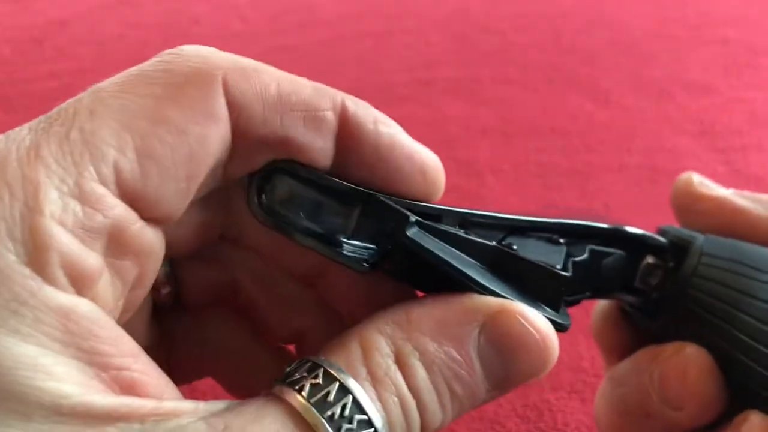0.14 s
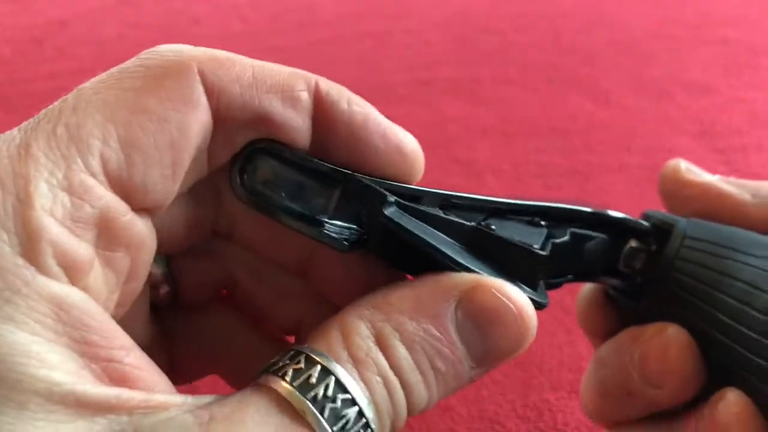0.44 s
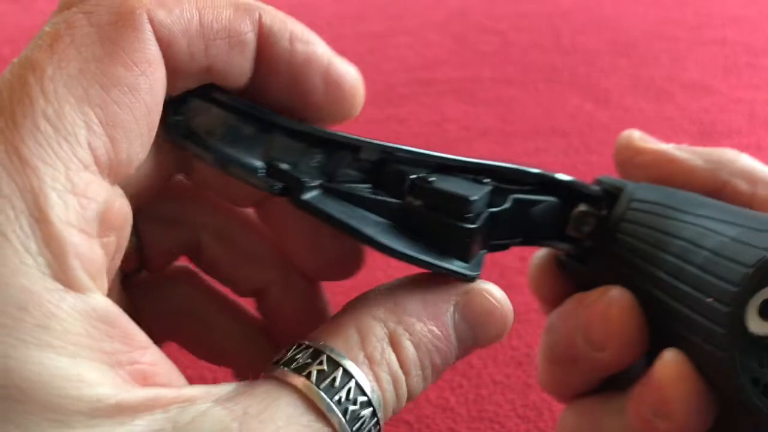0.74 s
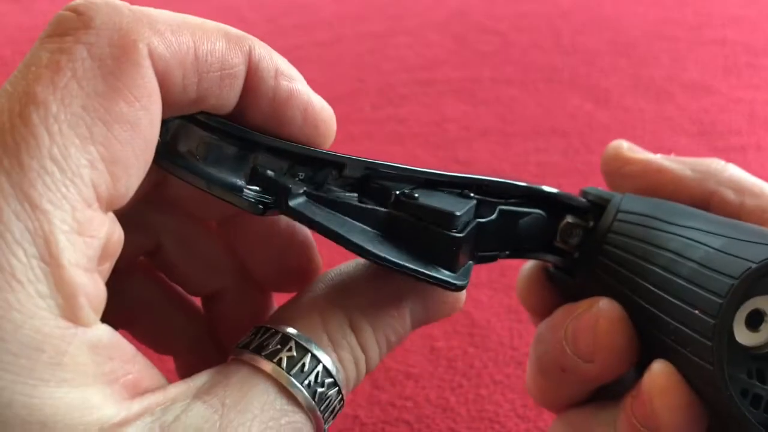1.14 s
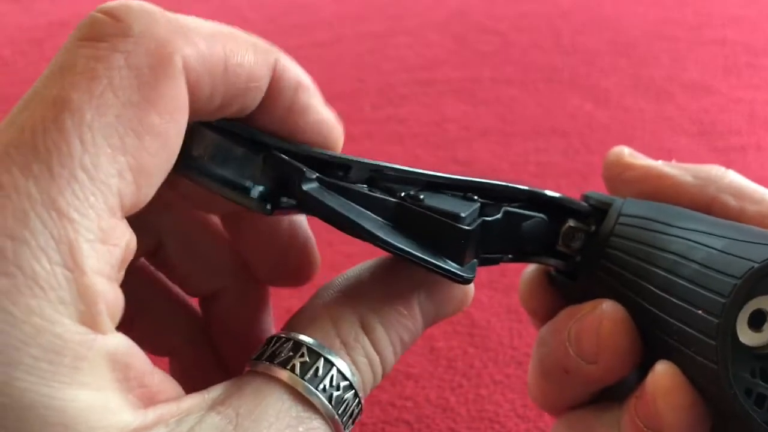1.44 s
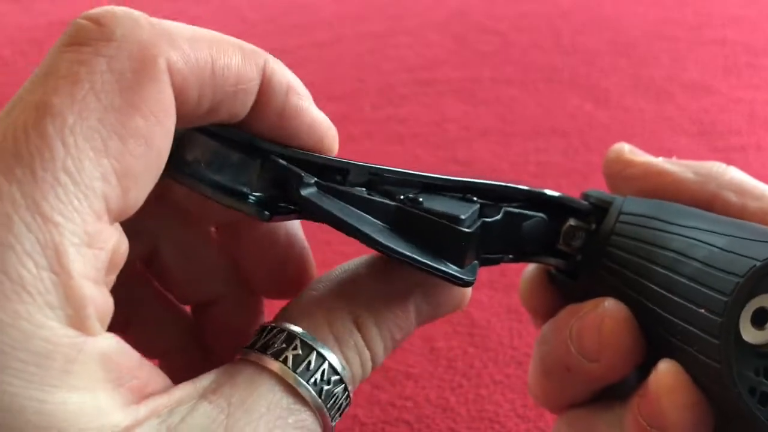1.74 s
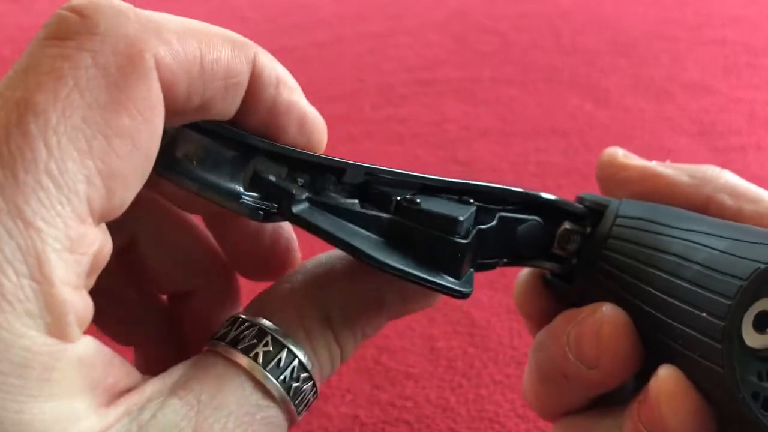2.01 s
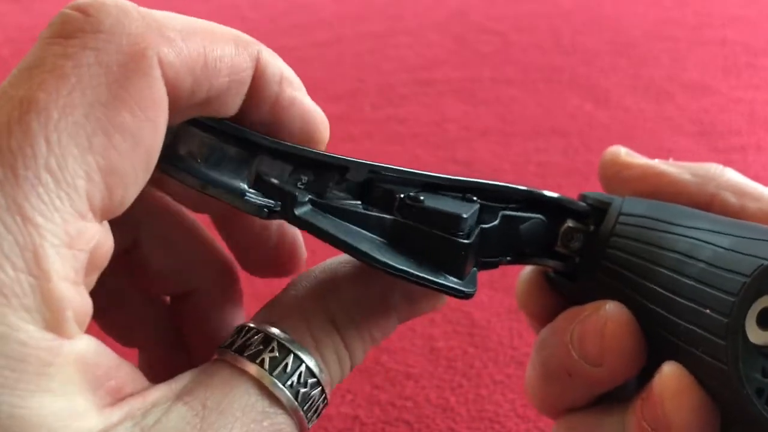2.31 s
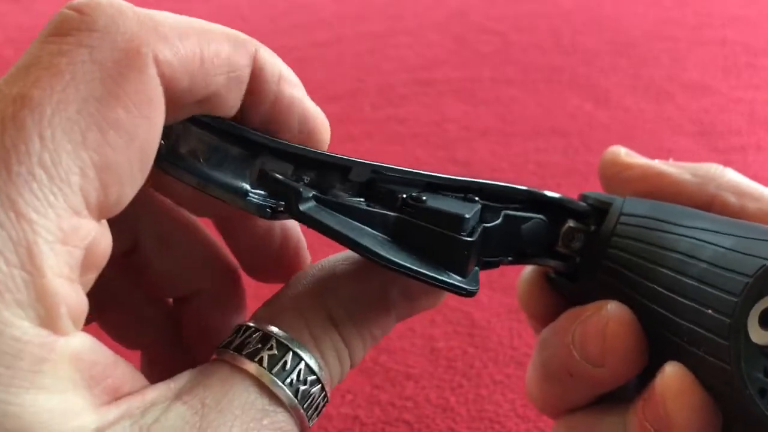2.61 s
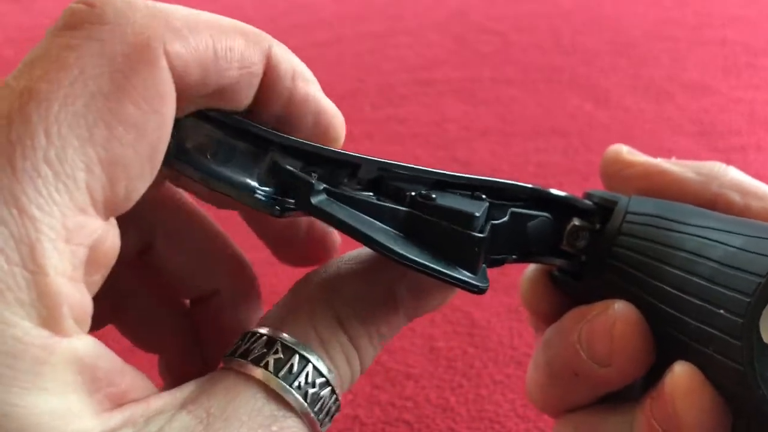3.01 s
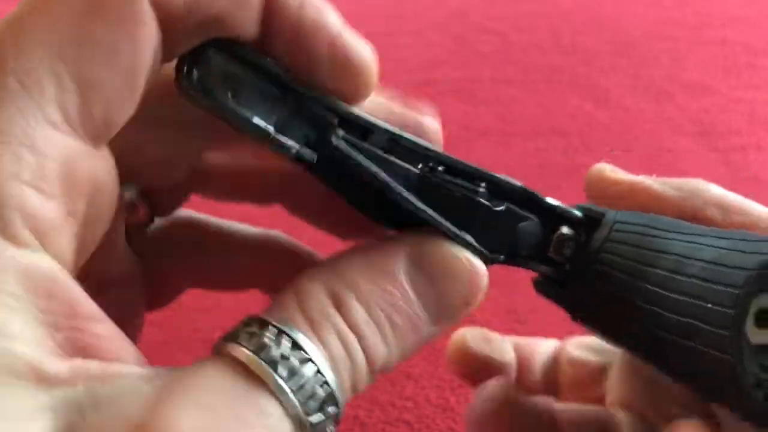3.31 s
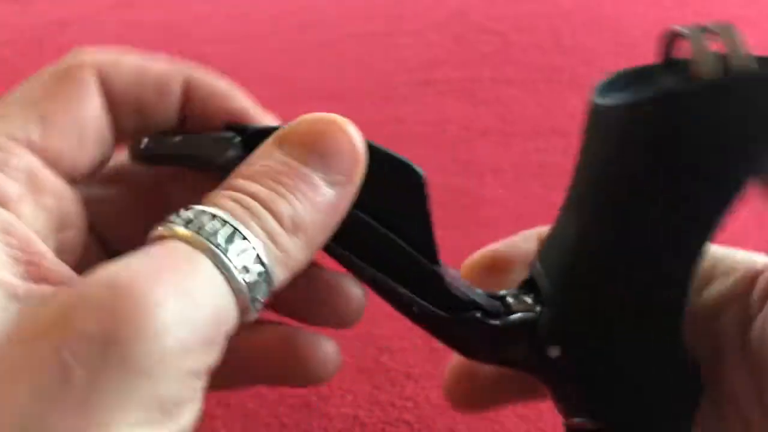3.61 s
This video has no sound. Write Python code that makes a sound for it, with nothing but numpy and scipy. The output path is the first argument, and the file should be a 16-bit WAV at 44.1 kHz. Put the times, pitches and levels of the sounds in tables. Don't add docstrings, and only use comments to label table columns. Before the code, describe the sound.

Two small buttons on a plastic lever snap under a thumb, very close to a phone microphone; first a short run, then a longer sharper one, then skin rubbing and one hard knock over faint room hiss.

```python
import sys
import numpy as np
from scipy import signal
from scipy.fft import rfft, irfft
from scipy.io import wavfile
from scipy.ndimage import uniform_filter1d

SR = 44100
rng = np.random.default_rng(int(sys.argv[2]) if len(sys.argv) > 2 else 0)


def int16_out(signal):
    q = np.round(np.clip(np.atleast_2d(signal).T, -1, 1) * 32767)
    wavfile.write(sys.argv[1], SR, q.astype(np.int16))


def rack_gain(trim_db):
    fader = np.asarray(trim_db, float)
    return 10 ** (fader / 20)


N = 165375
LEAD = 4410

# t/s, peak level/dB; one release of A falls before t = 0
A_PRESSES = [
    (0.1883, -3.5),
    (0.4698, -5),
]
A_RELEASES = [
    (0.3285, -6),
    (0.5829, -7.5),
              (-.03, -8),
]
B_PRESSES = [
    (1.3638, -0.89),
    (1.7131, -.6),
    (2.1727, -1),
    (2.5239, -0.26),
    (2.7846, -0.24),
]
B_RELEASES = [
    (1.5355, -5.5),
    (1.8539, -5.5),
    (2.3515, -5.5),
    (2.6597, -6),
    (2.9396, -6),
]
# f/Hz, width/Hz, level/dB
A_PRESS_CRACK = [(4000, 520, -31), (6240, 1800, -6), (11500, 4700, -10)]
A_RELEASE_CRACK = [(4350, 1000, -19), (5540, 650, -12.5), (12960, 1800, -17)]
B_PRESS_CRACK = [(7100, 1400, -3.5), (13900, 1200, -5)]
B_RELEASE_CRACK = [(5410, 1230, -4), (6600, 1460, -9), (13100, 1500, -21.5)]
# f/Hz, width/Hz, level/dB
A_PRESS_MODES = [(1600, 210, -19), (3270, 270, -8), (4730, 420, 0.5), (6350, 1300, -7), (7920, 390, -4.5),
                 (9910, 520, 2), (10750, 760, -2), (12400, 1640, 0.5), (14500, 1160, -19)]
A_RELEASE_MODES = [(1920, 530, -20.5), (3380, 430, -7), (4430, 720, -2.5), (5630, 570, -8.5),
                   (6790, 380, -14.5), (10000, 350, -12.5), (11020, 600, -8.5), (15400, 890, -20)]
B_PRESS_MODES = [(1750, 450, -19), (3300, 450, -8), (4400, 550, -3), (5800, 900, -2), (7000, 700, -5),
                 (8450, 1200, 2), (9500, 500, -4), (12200, 800, 2), (13700, 900, 3), (14800, 800, 0),
                 (15700, 700, -3)]
B_RELEASE_MODES = [(1840, 374, -16.5), (3390, 580, -6.5), (4450, 605, -3), (7880, 487, -5),
                   (10400, 350, -19), (12150, 610, -16), (12940, 460, -19), (16800, 270, -57)]
# gain/dB, thump level/dB, knock level/dB, hand echo delay/ms, hand echo level/dB
SNAP_KINDS = [
    (7, -42, -38, .28, -12.5),
    (4, -45.5, -50.5, .69, -8),
    (5.5, -46, -49, .75, -16.5),
    (4.5, -49.5, -52.5, .7, -15),
]
HAND_RATTLE_DB = [
    -23,
    -27,
    -24,
    -28,
]
# f/Hz, width/Hz, level/dB
WALL_SPILLS = [
    [(1600, 500, -8.5), (7000, 3100, 0.5), (10500, 3200, 0.5)],
    [(4460, 2000, -2.5), (3300, 1200, -8.5), (7000, 2200, -12)],
    [(5000, 3000, -5.5), (9900, 2600, -4), (12200, 5100, -4)],
    [(4800, 1500, 5), (3160, 2700, -5), (7000, 2700, -11)],
]
WALL_SPILL_DB = [
    0,
    2,
    -0.5,
    -0.5,
]


def buttons():
    snaps, body, spill = np.zeros((3, N + LEAD))
    parts = [
        (A_PRESSES, A_PRESS_CRACK + A_PRESS_MODES),
        (A_RELEASES, A_RELEASE_CRACK + A_RELEASE_MODES),
        (B_PRESSES, B_PRESS_CRACK + B_PRESS_MODES),
        (B_RELEASES, B_RELEASE_CRACK + B_RELEASE_MODES),
    ]
    steep = 1.467
    rise_s, choke_s = 0.00012, 0.0042
    rattle_rise_s, rattle_t60_s = 0.00012, 0.011
    t = np.arange(SR // 100) / SR
    shape = np.minimum(t / rise_s, 1) * np.exp(-(t / choke_s) ** 2)
    rattle_shape = np.minimum(t / rattle_rise_s, 1) * np.exp(-np.log(1000) * t / rattle_t60_s)
    thump = ring([(250, 68, 0)])
    jolt = ring([(119.3, 52, 0)], size=4096, steep=1.94)
    knock = ring([(1766, 260, 0)], steep=1.65)

    for (events, modes), kind, rattle_db, broad, spill_db in zip(
            parts, SNAP_KINDS, HAND_RATTLE_DB, WALL_SPILLS, WALL_SPILL_DB):
        gain_db, thump_db, knock_db, echo_ms, echo_db = kind
        hand = rack_gain(rattle_db) * rng.standard_normal(len(t)) * rattle_shape
        hand[0] = 1
        hand[int(echo_ms * SR / 1000)] = rack_gain(echo_db)
        for s, db in events:
            snap = ring(modes, rng.standard_normal((len(modes), 1)), steep=steep)
            snap = np.convolve(snap, hand)[:len(t)] * shape
            add(snaps, s, rack_gain(db + gain_db) * snap)
            add(spill, s, rack_gain(db + spill_db + 7) * ring(broad, steep=steep))
            add(body, s, rack_gain(thump_db) * thump)
            add(body, s + 0.008, rack_gain(-52.5) * jolt)
            add(body, s + 0.0035, rack_gain(knock_db) * knock)
    thin = signal.lfilter(*signal.butter(2, 1210, "high", fs=SR), snaps)
    return thin + body, spill


# t/s, peak level/dB, length/ms
RING_KNOCKS = [
    (3.5198, -22.5, 0.041),
    (3.5203, -20.5, 0.36),
    (3.5207, -13, 0.048),
    (3.521, -10, 0.63),
    (3.5225, -22, 1.5),
]
# f/Hz, width/Hz, level/dB
RING_KNOCK_MODES = [(944, 470, -6), (1710, 320, 0), (2500, 440, 3), (4200, 400, -16), (5260, 600, -10),
                    (6900, 450, -3.5), (8000, 540, -5), (8630, 380, -3), (10650, 2100, -7),
                    (11500, 350, -3), (13700, 2800, -13.5)]
# t/s, peak level/dB, length/ms
LEVER_RATTLES = [
    (3.5245, -41, 4.9),
    (3.527, -27, 1.2),
    (3.5303, -30, 2),
    (3.5315, -22.5, 3.3),
    (3.5345, -43, 2),
    (3.538, -29, 3.1),
    (3.543, -41, 6.2),
    (3.552, -43, 8.6),
]
# f/Hz, width/Hz, level/dB
LEVER_RATTLE_MODES = [(630, 1500, -7.5), (1670, 870, 0), (2600, 320, -0.5), (3230, 250, 7.5),
                      (4280, 1800, -11), (5570, 470, 0), (6900, 900, -6), (8160, 900, -15), (9400, 530, -8),
                      (11400, 400, 2)]
# t/s, peak level/dB, length/ms
LEVER_TAPS = [
    (3.448, -28, 1.8),
    (3.4588, -39, 2.5),
]
# f/Hz, width/Hz, level/dB
LEVER_TAP_MODES = [(1890, 190, -7), (3240, 210, -4.5), (3980, 300, -1.5), (5300, 370, -9), (6200, 370, -1),
                   (8500, 440, -3), (10100, 370, -13), (11400, 190, -10), (12100, 350, -11)]


def lever_contacts():
    knocks = chatter(RING_KNOCKS, RING_KNOCK_MODES)
    rattles = chatter(LEVER_RATTLES, LEVER_RATTLE_MODES)
    return knocks + rattles + chatter(LEVER_TAPS, LEVER_TAP_MODES)


def chatter(events, modes):
    out = np.zeros(N + LEAD)
    t = np.arange(SR // 50) / SR
    for s, db, length_ms in events:
        burst = rng.standard_normal(len(t)) * np.exp(-(t * 1000 / length_ms) ** 2)
        response = ring(modes, rng.standard_normal((len(modes), 1)), size=4096, steep=1.467)
        y = np.convolve(burst, response)
        add(out, s, rack_gain(db) * y / np.abs(y).max())
    return out


# t/s, peak level/dB, f/Hz, width/Hz
TICKS_AND_THUDS = [(0.63, -43, 1320, 506), (0.631, -46, 275, 100), (.668, -41.5, 6500, 3000),
                   (.6285, -45.5, 805, 900), (0.671, -43.5, 1605, 260), (1.040, -62.5, 4210, 890),
                   (1.281, -49, 9000, 7000), (1.321, -47.5, 8000, 7000), (1.343, -52, 10100, 7000),
                   (1.852, -33, 4800, 2500), (2.443, -25, 8000, 9000), (2.503, -49, 8000, 6040),
                   (2.665, -20.5, 6500, 3000), (3.1985, -29, 6500, 5000), (3.1985, -40, 11100, 5000),
                   (3.387, -46.5, 1490, 1200), (3.391, -46, 1740, 700), (3.48, -44, 7000, 7000),
                   (3.509, -33, 7000, 5000), (3.582, -52, 11500, 400), (1.924, -52, 1600, 300),
                   (3.407, -54, 1500, 250), (3.455, -50, 1820, 300), (3.459, -41, 3420, 500),
                   (3.5, -53, 1500, 300), (3.51, -36, 2080, 500), (3.572, -37, 9000, 4000),
                   (3.574, -51, 11400, 300), (3.5209, -41.5, 315, 347), (3.53, -49.5, 68, 25),
                   (3.742, -49.5, 1530, 400)]


def ticks():
    out = np.zeros(N + LEAD)
    for s, db, hz, width in TICKS_AND_THUDS:
        add(out, s, rack_gain(db) * ring([(hz, width, 0)], size=6144, steep=2))
    return out


# start t/s, length/s, rms level/dB, share of broad hiss/0-1, pitch factor/1
FINGER_RUBS = [
    (0.743, 0.13, -62.5, 0.13, 1),
    (0.895, 0.094, -68, .02, 1),
    (1.084, 0.047, -61, 0.1, 1.05),
    (3.114, 0.13, -61, 0.3, 1.1),
    (3.178, 0.095, -58, 0.25, 0.97),
    (3.185, 0.021, -60, .95, 1.01),
    (3.336, 0.1, -60, 0.1, 0.923),
    (3.414, 0.079, -51, 1, 1.01),
    (3.482, 0.1, -51, 0.72, 1.01),
    (3.672, 0.071, -59, 1, 1.01),
]
# f/Hz, width/Hz, level/dB
FINGER_RUB_MODES = [(1660, 630, -8.5), (3880, 990, -1.5), (9000, 1200, -4.5)]


def rubs():
    out = np.zeros(N + LEAD)
    broad = band(5100, 13200)
    grain = rack_gain(1.8 * walk(150))
    soft = treble_limit(8, 15500)
    for s, length, db, share, pitch in FINGER_RUBS:
        tuned = np.zeros(N)
        for hz, width, mode_db in FINGER_RUB_MODES:
            factor = pitch if hz < 6000 else 1
            tuned += rack_gain(mode_db) * band(hz * factor, width)
        slide = (np.sqrt(1 - share) * tuned + np.sqrt(share) * broad) * grain
        i, n = int(s * SR), int(length * SR)
        stroke = np.hanning(n) ** 0.47
        add(out, s, rack_gain(db) * stroke * signal.sosfilt(soft, slide[i:i + n]))
    return out


# delay t/ms, level/dB
WALL_ECHOES = [
    (8.2, -38),
    (11.5, -33),
    (16.8, -35),
    (20.5, -42.5),
]


def room(x):
    t = np.arange(SR // 2) / SR
    after = np.maximum(t - 0.0065, 0)

    def fade(t60_s):
        return np.exp(-np.log(1000) * after / t60_s) * (after > 0)

    noise = rng.standard_normal((2, len(t)))
    late = signal.lfilter(*signal.butter(2, 6500, fs=SR), noise[0]) * fade(0.34)
    early = rack_gain(0.5) * noise[1] * fade(0.24)
    tail = rack_gain(-30.5 - 29.0) * (late + early)
    for delay_ms, db in WALL_ECHOES:
        tail[int(delay_ms * SR / 1000)] += rack_gain(db)
    tail = tail + 0.13 * signal.lfilter(*signal.iirpeak(5200, 2.5, fs=SR), tail)
    tail = signal.sosfilt(treble_limit(8, 15500), tail)
    return signal.fftconvolve(x, tail)[:len(x)]


# f/Hz, level per Hz/dB
AIR_SPECTRUM = [(35, -41.5), (60, -1), (114, -7), (136, -2.5), (166, -12), (246, -5.5), (500, -24),
                (650, -29.5), (1100, -120)]
# f/Hz, level per Hz/dB
HISS_SPECTRUM = [(210, -13.5), (350, -7.5), (615, -6), (711, -6), (1450, -8.5), (3040, -10), (4540, -11.5),
                 (15200, -15.5), (16500, -50)]
# from t/s, to t/s, level/dB
HISS_GATE = [
    (0.985, 1.097, -8),
    (1.099, 1.159, -3.5),
    (1.156, 1.356, -9.5),
    (3.349, 3.406, -4.5),
]
# f/Hz, width/Hz, level/dB
HUM_BANDS = [
    (100, 6.9, -72),
    (153, 25, -74.5),
    (247.3, 11, -78.5),
]
# t/s, rms level/dB
RUMBLE_LEVEL = [(0, -57), (.15, -60), (.6, -63), (.9, -53.5), (1.4, -62), (1.7, -63), (2.2, -69),
                (3.75, -67)]


def floor():
    t = np.arange(N) / SR
    air = coloured(AIR_SPECTRUM, -62.5) * rack_gain(walk(18))
    hum = sum(rack_gain(db - 1.1 * walk(5.0)) * band(hz, width) for hz, width, db in HUM_BANDS)
    rumble = rack_gain(np.interp(t, *np.array(RUMBLE_LEVEL).T)) * band(43.4, 4)
    gate_db = sum(db * ((t > start) & (t < end)) for start, end, db in HISS_GATE)
    gate_db = uniform_filter1d(gate_db, int(0.0029 * SR))
    hiss = coloured(HISS_SPECTRUM, -62) * rack_gain(gate_db + 0.5 * walk(7.8))
    return air + hum + rumble + hiss


def port(x):
    hz, width_hz = 10900, 670
    return x - 0.54 * signal.lfilter(*signal.iirpeak(hz, hz / width_hz, fs=SR), x)


def ring(modes, chance=0, size=2048, steep=1):
    hz, width, db = np.array(modes, float).T[:, :, None]
    f = np.arange(size + 1) * SR / (2 * size) + 1
    hz = hz * (1 + 0.0027 * chance)
    db = db + 1.7 * chance
    detuning = (f - hz ** 2 / f) / width
    power = np.sum(rack_gain(db) ** 2 / (1 + detuning ** 2) ** steep, axis=0)
    cepstrum = irfft(np.log(power) / 2)[:size]
    causal = cepstrum * np.where(np.arange(size) > 0, 2, 1)
    y = irfft(np.exp(rfft(causal, 2 * size)))[:size]
    return y / np.abs(y).max()


def add(out, s, y):
    i = int(s * SR) + LEAD
    out[i:i + len(y)] += y[:len(out) - i]


def band(hz, width):
    peak = signal.iirpeak(hz, hz / width, fs=SR)
    y = signal.lfilter(*peak, signal.lfilter(*peak, rng.standard_normal(N)))
    return y / y.std()


def coloured(points, db):
    hz, gain_db = np.array(points, float).T
    log_f = np.log(np.arange(N // 2 + 1) * SR / N + 1)
    gain = rack_gain(np.interp(log_f, np.log(hz), gain_db, left=-90, right=-90))
    y = irfft(rfft(rng.standard_normal(N)) * gain, N)
    return y * rack_gain(db) / y.std()


def walk(rate):
    k = int(SR / rate)
    y = uniform_filter1d(uniform_filter1d(rng.standard_normal(N), k), k)
    return y / y.std()


def treble_limit(order, top_hz):
    return signal.cheby1(order, 0.5, top_hz, fs=SR, output="sos")


def scene():
    near, spill = buttons()
    hands = lever_contacts() + ticks() + rubs()
    wet = room(spill + rack_gain(5) * hands)
    far = signal.sosfilt(treble_limit(10, 15800), wet[LEAD:] + floor())
    return ((near + hands)[LEAD:] + port(far))[None]


def roll_off(x):
    return signal.sosfilt(signal.butter(12, 17200, fs=SR, output="sos"), x)


def record(dry):
    x = signal.sosfilt(signal.butter(4, 36, "high", fs=SR, output="sos"), dry)
    x = signal.sosfilt(treble_limit(12, 16400), x)
    return roll_off(x)


dry = scene()
out = record(dry)
int16_out(out)
```